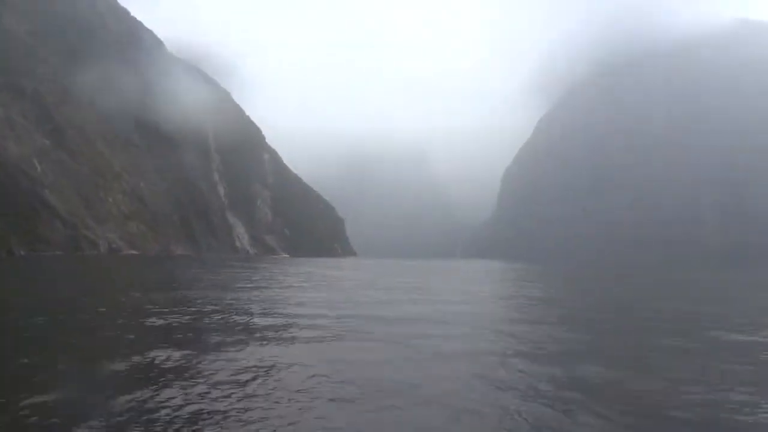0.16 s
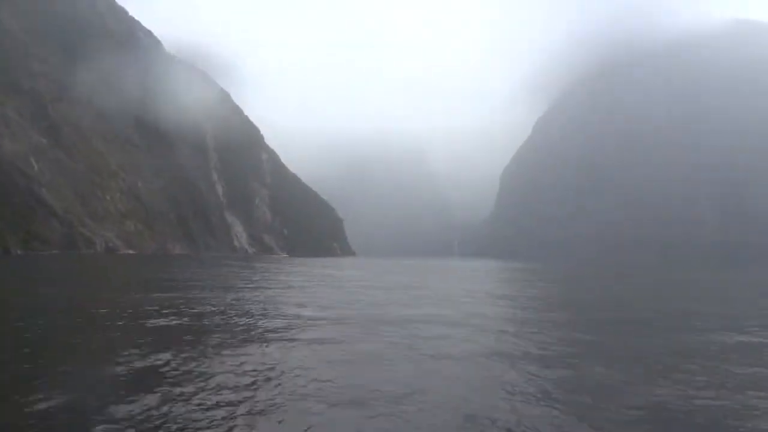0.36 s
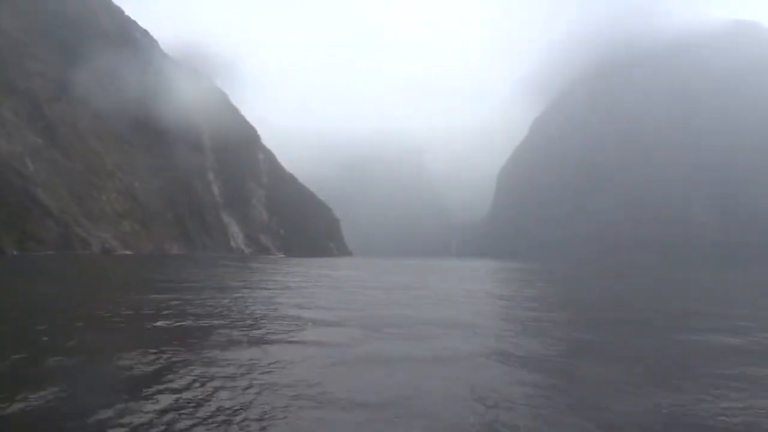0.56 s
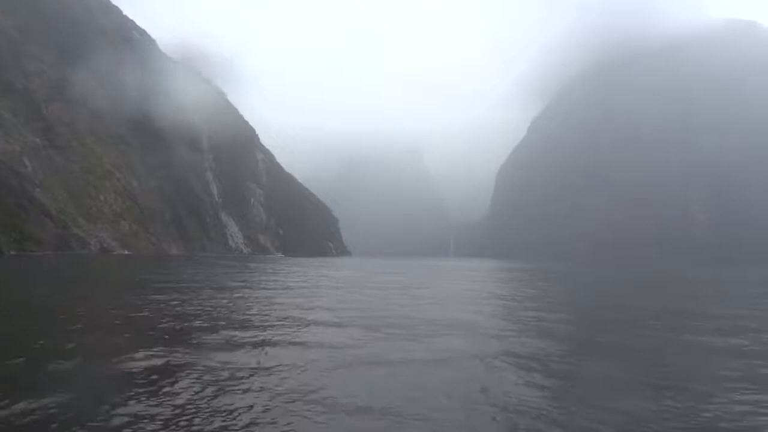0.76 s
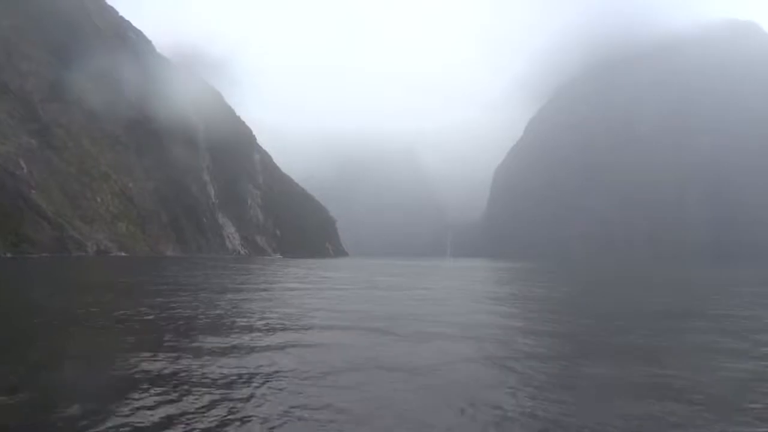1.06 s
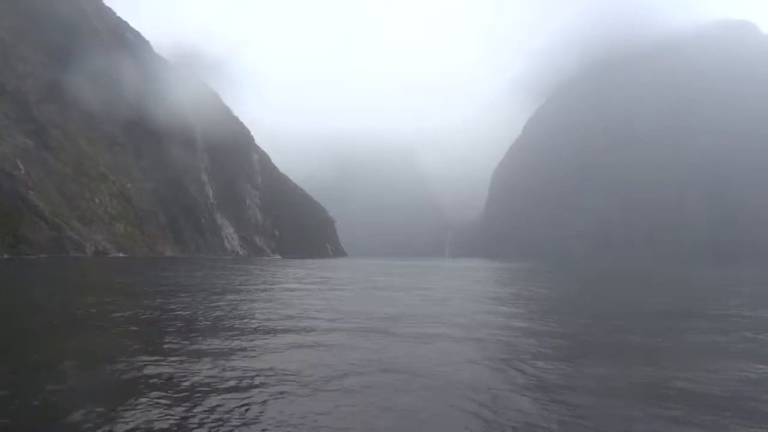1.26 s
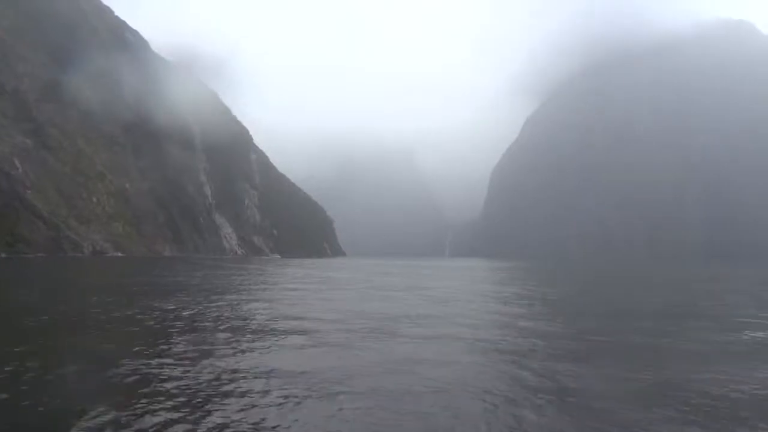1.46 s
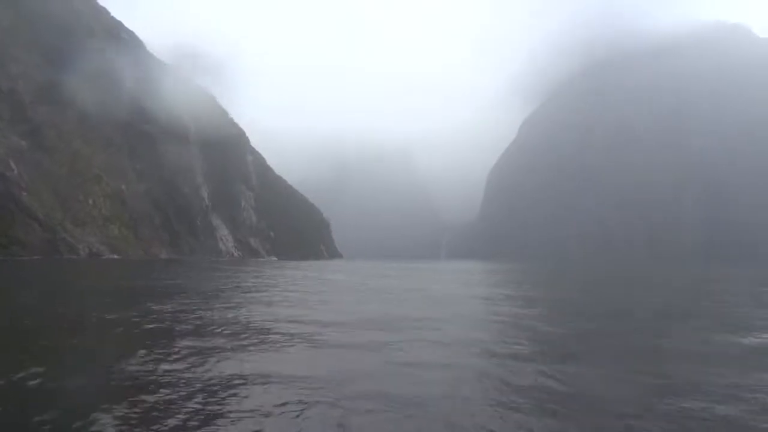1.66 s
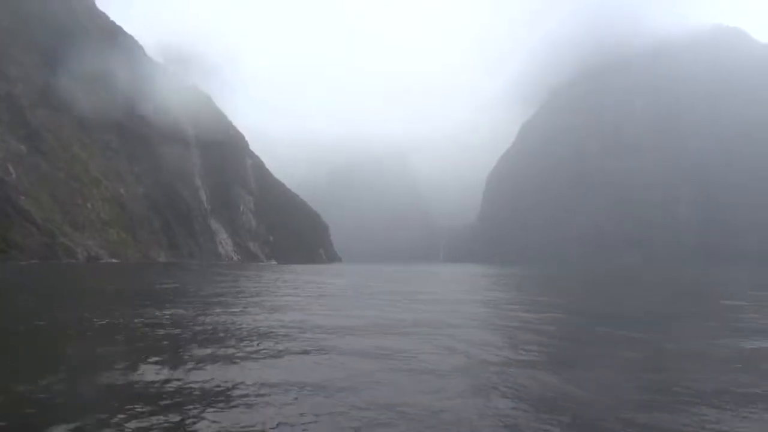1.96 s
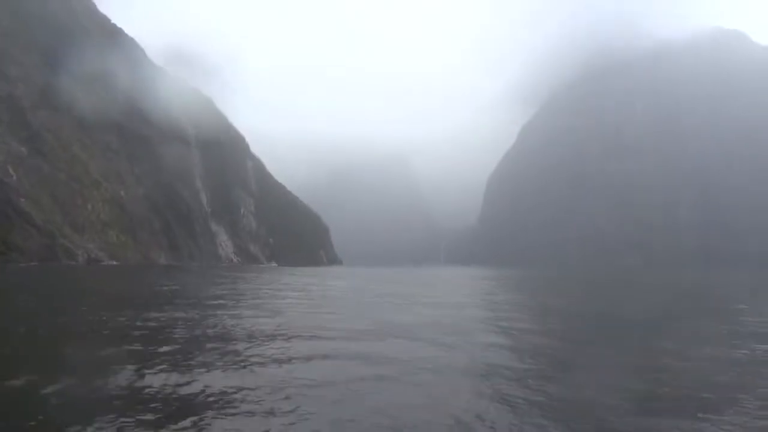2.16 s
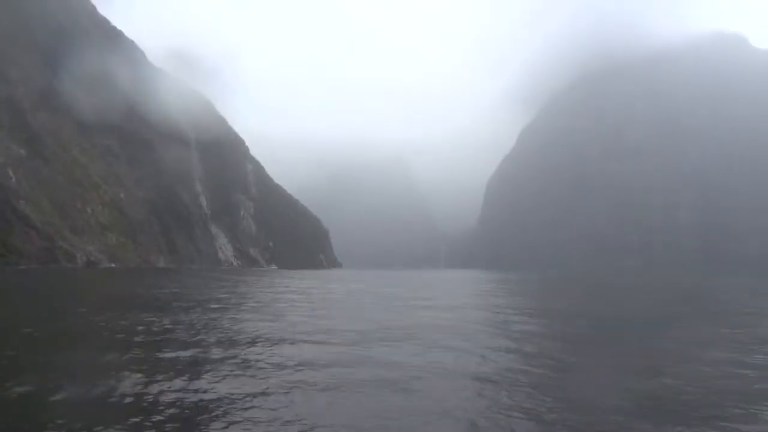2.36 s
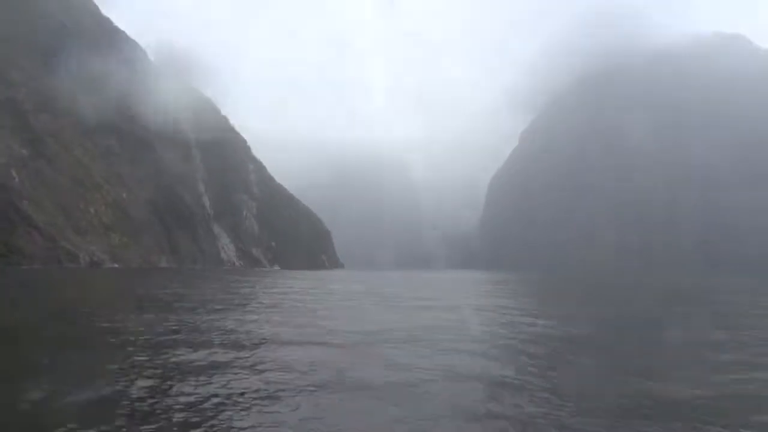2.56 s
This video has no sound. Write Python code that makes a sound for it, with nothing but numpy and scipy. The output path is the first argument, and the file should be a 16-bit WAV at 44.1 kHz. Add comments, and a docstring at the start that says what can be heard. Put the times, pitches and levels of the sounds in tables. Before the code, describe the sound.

A boat's engines drone low and throb throughout, heard from the open deck with rushing water and wind rumbling on the microphone. The drone rises in the first 0.2 seconds and is fullest from about 0.8 to 1.4 seconds. The water swells around 0.4 to 0.7 seconds. Gusts flutter and briefly choke the hiss near 0.3 and from 1.5 to 1.8 seconds. The drone eases, then swells again near 2.5 seconds.

```python
"""On a moving boat's deck

Two engines drone through the hull. Their speeds differ a little, so the drone throbs.
Water rushes and swells at the bow. Wind buffets the microphone's two openings, reaching
the left one first, and gusts briefly choke the hiss the microphone picks up."""
import sys
import numpy as np
from scipy import signal
from scipy.fft import rfft, irfft, next_fast_len
from scipy.io import wavfile
from scipy.ndimage import uniform_filter1d

SR = 44100
rng = np.random.default_rng(int(sys.argv[2]) if len(sys.argv) > 2 else 0)


def pcm_store(signal):
    """Save signal as 16-bit PCM."""
    levels = np.round(np.clip(np.atleast_2d(signal), -1, 1) * 32767)
    wavfile.write(sys.argv[1], SR, levels.astype(np.int16).T)


N = 119070
T = np.arange(N) / SR


def gain(db):
    """Turn decibels into a multiplier."""
    return 10 ** (np.asarray(db) / 20)


def over_time(table, column):
    """Join one column's values with straight lines through time."""
    return np.interp(T, np.array(table)[:, 0], np.array(table)[:, column])


def at_pitch(table, hz):
    """Look up a value by frequency, spacing octaves evenly."""
    return np.interp(np.log(hz), np.log(np.array(table)[:, 0]), np.array(table)[:, 1])


def wander(per_second):
    """Glide smoothly between random values, roughly 1 in size."""
    hold = int(SR / per_second)
    steps = np.repeat(rng.standard_normal(N // hold + 1), hold)
    return 1.3 * uniform_filter1d(uniform_filter1d(steps, hold), hold)[:N]


def noise_bands(colour, delay_s=0):
    """Split two noises into half-octave bands; a delay adds a late copy of the first."""
    size = next_fast_len(N)
    freqs = np.maximum(np.arange(size // 2 + 1) * SR / size, 1)
    spectra = rfft(rng.standard_normal((2, size))) * gain(at_pitch(colour, freqs)) * (freqs > 15)
    spectra /= np.sqrt(2 * np.sum(abs(spectra[0]) ** 2)) / size
    if delay_s:
        spectra = np.vstack([spectra, spectra[0] * np.exp(-2j * np.pi * freqs * delay_s)])
    for hz in 22 * 2 ** np.arange(0, np.log2(colour[-1][0] / 16), .5):
        window = np.cos(np.pi / 2 * np.clip(2 * np.log2(freqs / hz), -1, 1)) ** 2
        yield hz, irfft(spectra * window, size)[:, :N]


# The firing drone swells and sinks. Each row: time in seconds, level change in dB.
DRONE_SWELL = [(0, -12), (.2, -1), (.5, 0.5), (.8, 2.5), (1.1, 1.5), (1.37, 3.5), (1.65, -1.5),
               (1.95, -2.5), (2.2, -1.5), (2.55, 1.5), (2.7, -3)]
# Each engine's other tones. Each row: vibrations per shaft turn, level in dB.
SLOW_ENGINE_TONES = [(2.5, -43.5), (7, -27.5), (8, -35.5), (9, -36.5), (11, -36), (20, -37.5), (40, -45),
                     (54, -50.5), (60, -52), (100, -52.5), (120, -57)]
FAST_ENGINE_TONES = [(3, -36.5), (4.5, -36), (5, -36.5), (5.5, -30.5), (6, -39.5), (42, -45.5), (60, -44.5),
                     (100, -55), (168, -62)]

def engine(shaft_hz, firing_db, tones):
    """Four firings per shaft turn make a drone; other tones waver around it."""
    in_step_s = .197  # both engines' drones line up near this time
    drift_s = np.cumsum(0.000796 * wander(3)) / SR
    angle = 2 * np.pi * shaft_hz * (T - in_step_s + drift_s - np.mean(drift_s))
    out = gain(firing_db + over_time(DRONE_SWELL, 1)) * np.sin(4 * angle)
    for per_turn, db in tones:
        level = gain(db + 2.5 * wander(2.9))
        out += level * np.sin(per_turn * angle + 2 * np.pi * rng.random())
    return np.sqrt(2) * out


# The tone of the water and hull rumble. Each row: frequency in Hz, relative level in dB.
WASH_COLOUR = [(25, -18), (45, -7), (75, -0.5), (110, -2.5), (160, -7.5), (250, -8), (350, -9.5),
               (500, -11.5), (1000, -15.5), (1600, -20), (2500, -26.5), (4000, -33), (6500, -38),
               (11000, -42)]
# How wide it sounds. Each row: frequency in Hz, side noise compared with centre noise in dB.
WASH_WIDTH = [(50, -2.5), (300, -3.5), (650, -17), (900, -13), (1300, -10.5), (3500, -9), (11000, -10)]
# Which way it leans. Each row: frequency in Hz, left minus right in dB.
WASH_BALANCE = [(400, -0.5), (1100, -0.5), (2200, 1), (3500, -.4), (11000, -1.1)]
# Its swells. Each row: time in seconds, then level changes in dB at 500, 1500 and 6000 Hz.
WASH_SWELLS = [(0, -2, 1, -1), (.2, -0.5, 0.46, 0.5), (.36, 2.5, 0.22, 3), (.46, 1.5, 1.3, 4),
               (.56, 1, 0.87, 3.5), (.66, 5, 1.6, 2.5), (.8, -0.5, 1.7, 1), (.92, 0, 0.15, 2),
               (1.07, -2, 0.077, -2), (1.25, 0.5, 0.27, -3), (1.42, -2.5, -0.37, -0.5),
               (1.65, 0.5, -2.9, -2.5), (1.85, -1, -1, -2), (2.05, 2, -0.14, -0.5), (2.2, 2, 0.72, 0),
               (2.36, 0, 0.99, 0.5), (2.55, -3.5, -0.31, 0), (2.7, 1.5, -1.5, -2)]
# Gusts choke the microphone. Each row: start in seconds, depth in dB, recovery time in seconds.
MICROPHONE_CHOKES = [(.272, 6.5, .02), (.403, 6, 0.012), (.685, 2.5, 0.026), (1.508, 7, 0.014),
                     (1.6, 0, .02), (1.69, 4.5, .015), (1.75, 10.5, .022), (2.69, 1, .02)]

def bow_wash():
    """Rushing water swells and flickers; gusts hitting the microphone briefly choke the hiss."""
    choke_db, fall_s = 0, 0.006
    for start, depth_db, recovery_s in MICROPHONE_CHOKES:
        fall = np.clip((T - start) / fall_s, 0, 1)
        choke_db += depth_db * fall * np.exp(-np.maximum(T - start - fall_s, 0) / recovery_s)
    low_db = over_time(WASH_SWELLS, 1) - .3 * choke_db
    middle_db = over_time(WASH_SWELLS, 2) + 0.63 * wander(8.5) - choke_db
    high_db = over_time(WASH_SWELLS, 3) + 0.63 * wander(17) - choke_db
    swell_hz, swells = (150, 500, 1500, 6000), (0, low_db, middle_db, high_db)
    out = 0
    for hz, (centre, side) in noise_bands(WASH_COLOUR):
        # Each band follows the swells nearest to it in pitch.
        weights = [at_pitch(list(zip(swell_hz, row)), hz) for row in np.eye(4)]
        swell_db = sum(weight * db for weight, db in zip(weights, swells))
        flicker_db = 0.54 * wander(20)
        side = side * gain(at_pitch(WASH_WIDTH, hz))
        lean_db = at_pitch(WASH_BALANCE, hz) / 2
        stereo = np.array([(centre + side) * gain(lean_db), (centre - side) * gain(-lean_db)])
        out += gain(swell_db + flicker_db) * stereo
    return out * gain(-22)


# The tone of the wind. Each row: frequency in Hz, relative level in dB.
WIND_COLOUR = [(25, -12), (55, -8.5), (90, 0), (150, 0.5), (220, -1), (300, -1), (420, -3.5), (600, -14.5),
               (900, -15.5), (1400, -27.5)]
# Chance rises and falls of the low rumble, and bursts of higher flutter.
# Each row: time in seconds, then relative levels in dB of the rumble and the flutter.
WIND_LEVELS = [(0, -25, -28), (.07, -25, -34), (.17, -21, -32), (.24, -21, -28.5), (.29, -23.5, -28),
               (.34, -32, -34), (.41, -21.5, -27), (.49, -24, -32), (.59, -24, -39), (.7, -24, -29.5),
               (.86, -23.5, -30.5), (.99, -22, -36.5), (1.03, -28, -49), (1.14, -23, -42),
               (1.3, -22.5, -38.5), (1.42, -19, -38), (1.5, -19.5, -23), (1.56, -20.5, -31),
               (1.61, -18.5, -25), (1.67, -23.5, -32), (1.85, -20, -28.5), (1.9, -19.5, -35),
               (1.96, -26, -26), (2.01, -17.5, -43), (2.07, -25, -35), (2.16, -18.5, -32.5),
               (2.2, -24, -37), (2.25, -21, -35), (2.31, -20.5, -29.5), (2.47, -24, -36),
               (2.53, -21.5, -25.5), (2.6, -29, -36), (2.7, -23, -39)]

def wind():
    """Swirls of air roll over the left opening, then the right, breaking up on the way."""
    rumble_db = over_time(WIND_LEVELS, 1)
    flutter_db = over_time(WIND_LEVELS, 2) + 4 + 2.5 * wander(25.04)
    out = 0
    for hz, (left, fresh, delayed) in noise_bands(WIND_COLOUR, delay_s=0.00086):
        db, shared = (flutter_db, .75) if hz > 330 else (rumble_db, 0.48)
        right = shared * delayed + np.sqrt(1 - shared ** 2) * fresh
        out += gain(db) * np.array([left, right])
    return out * gain(3.5)


def scene():
    """Both engines sit in the centre, with water and wind spread around them."""
    slow = engine(shaft_hz=21.123, firing_db=-25, tones=SLOW_ENGINE_TONES)
    fast = engine(shaft_hz=21.98, firing_db=-21, tones=FAST_ENGINE_TONES)
    return slow + fast + bow_wash() + wind()


def record(dry):
    """The camera cuts off the highest treble."""
    cutoff_hz = 10990
    return signal.sosfilt(signal.ellip(16, .3, 70, cutoff_hz, fs=SR, output="sos"), dry)


dry = scene()
out = record(dry)
pcm_store(out)
```